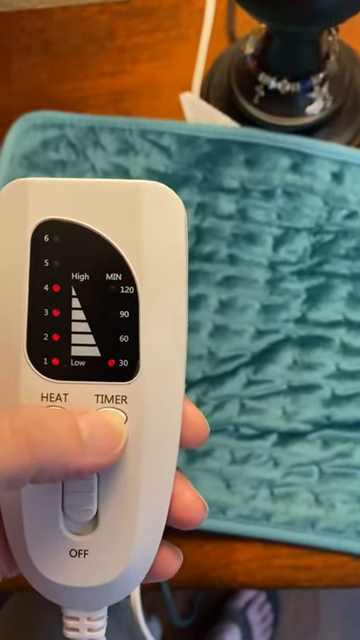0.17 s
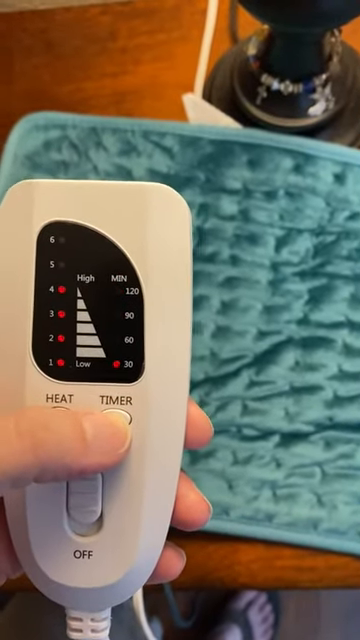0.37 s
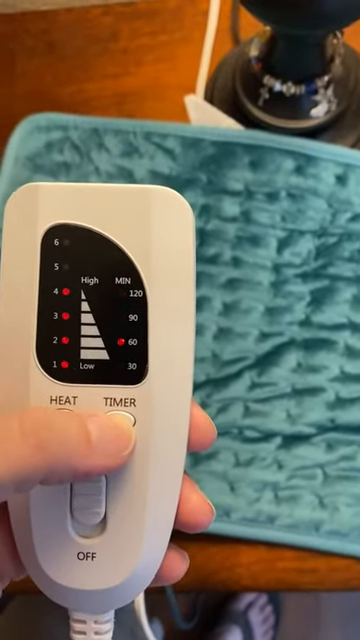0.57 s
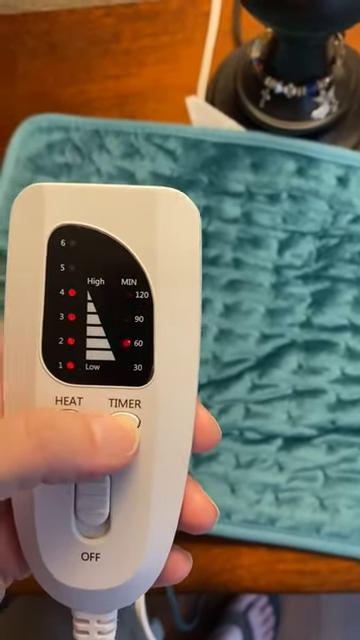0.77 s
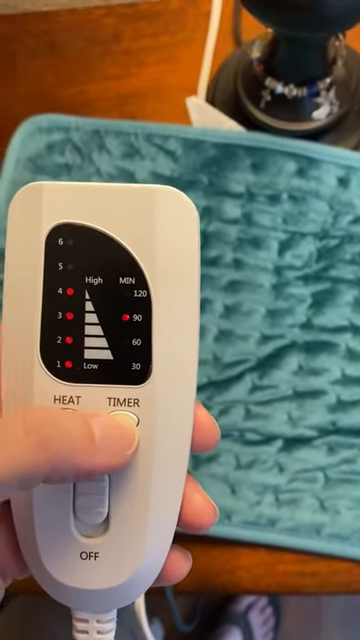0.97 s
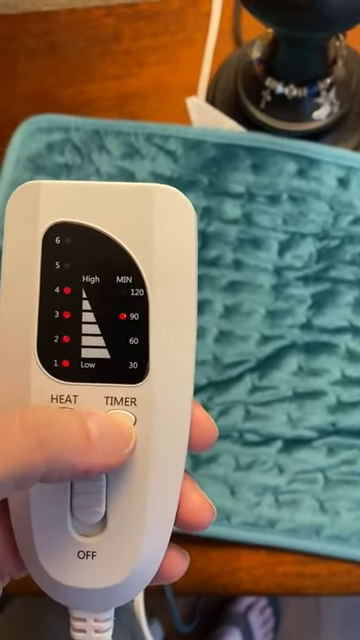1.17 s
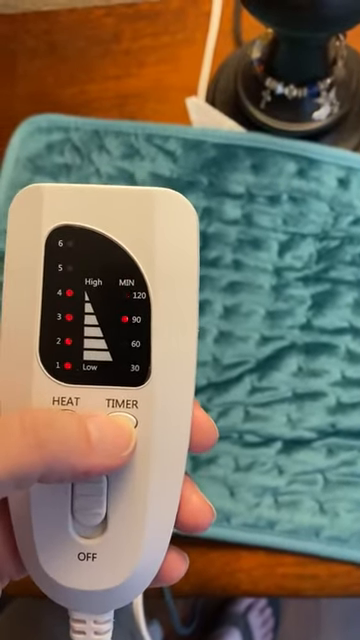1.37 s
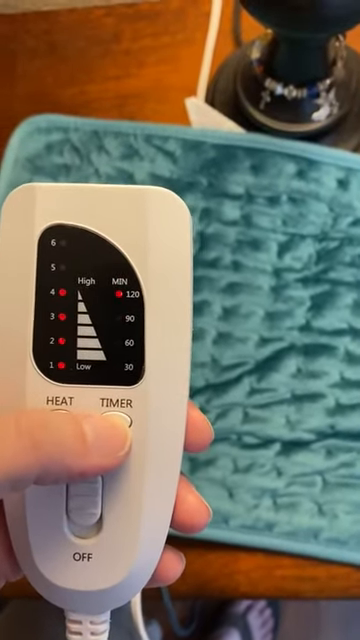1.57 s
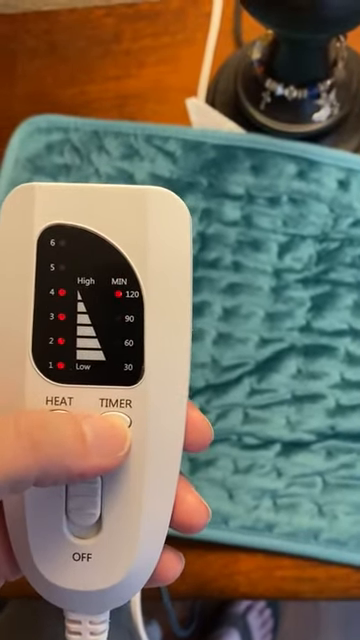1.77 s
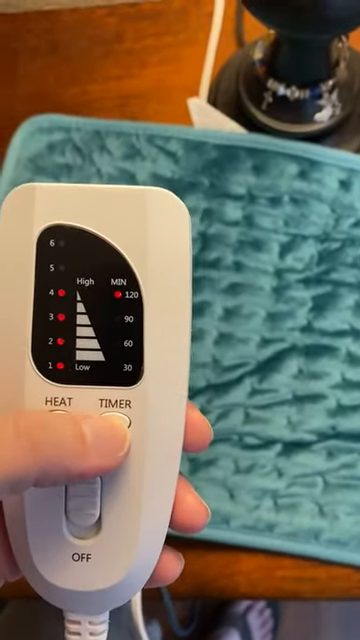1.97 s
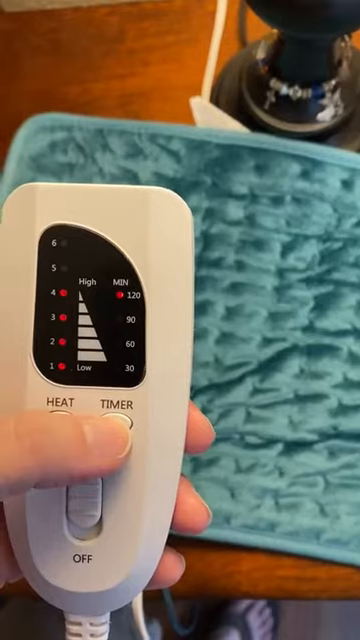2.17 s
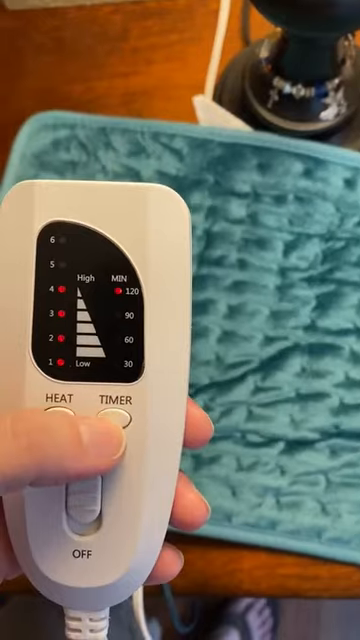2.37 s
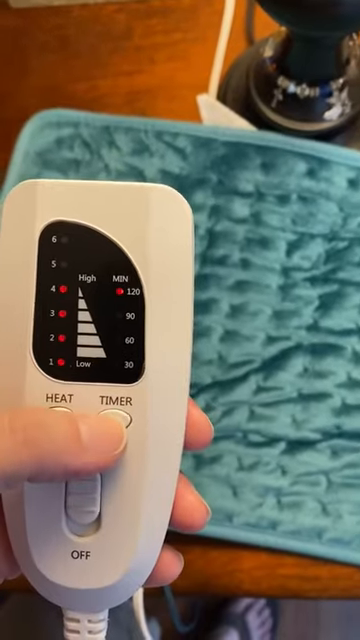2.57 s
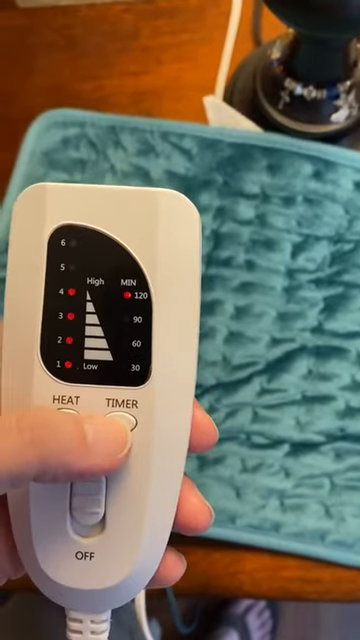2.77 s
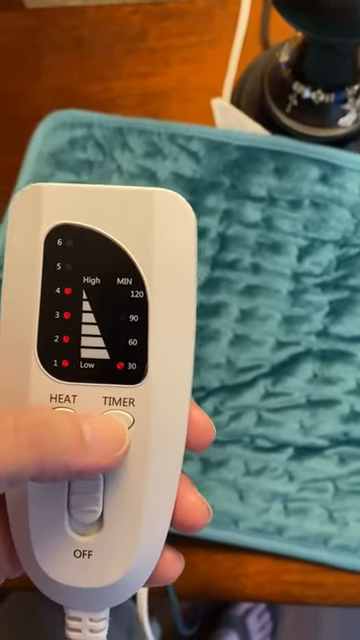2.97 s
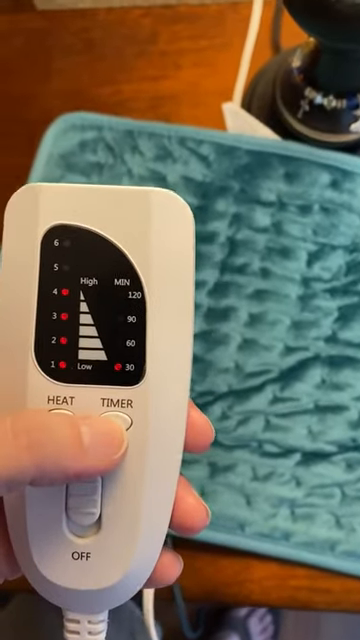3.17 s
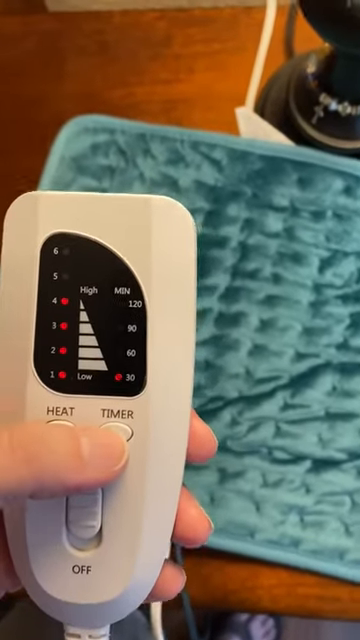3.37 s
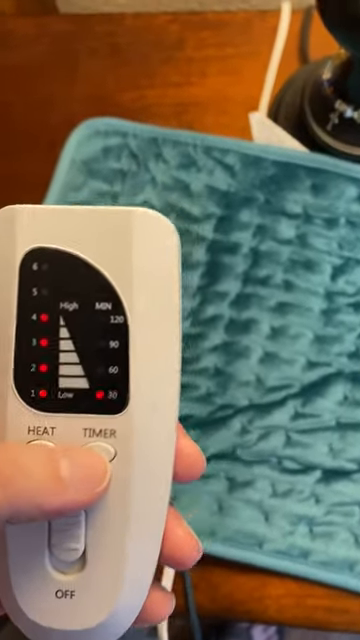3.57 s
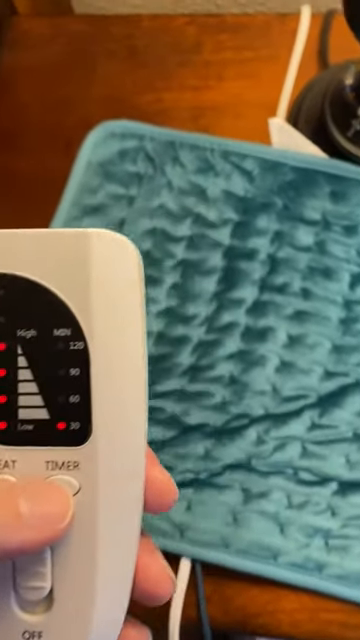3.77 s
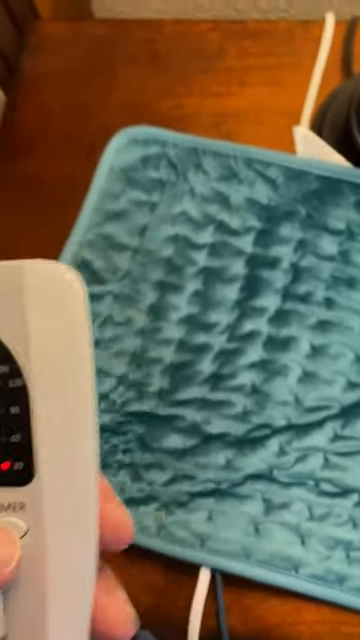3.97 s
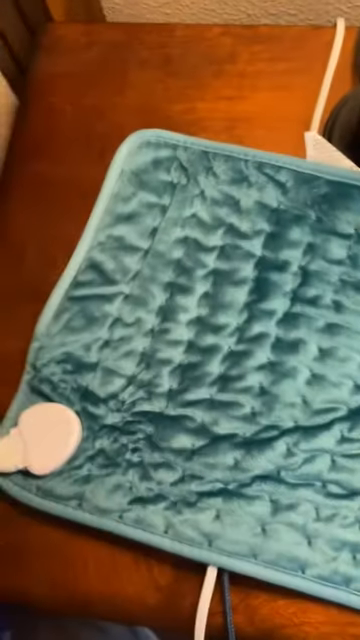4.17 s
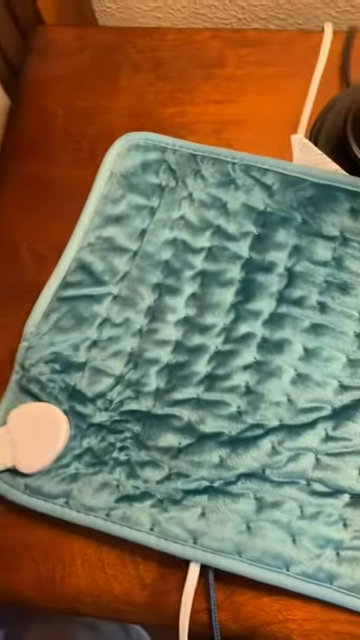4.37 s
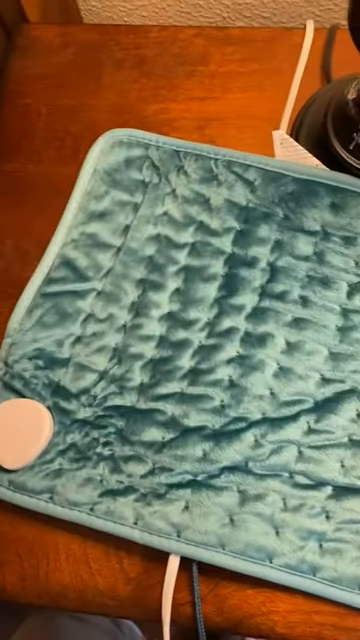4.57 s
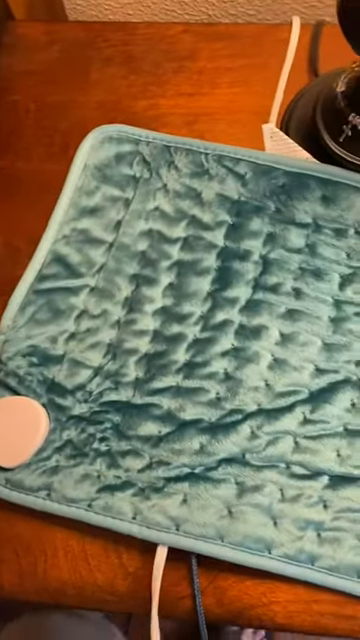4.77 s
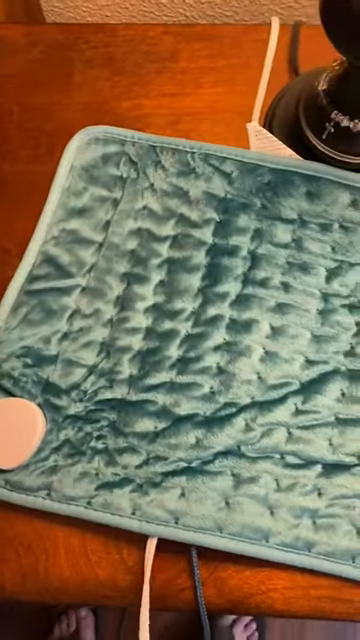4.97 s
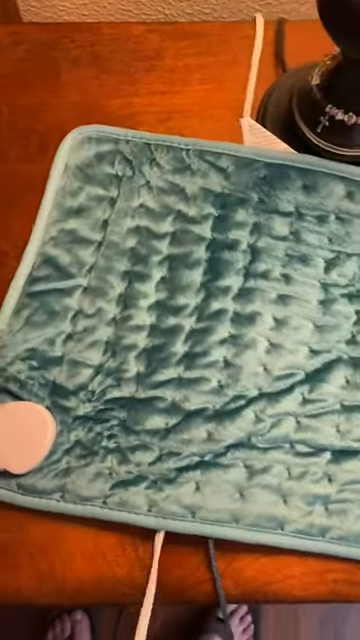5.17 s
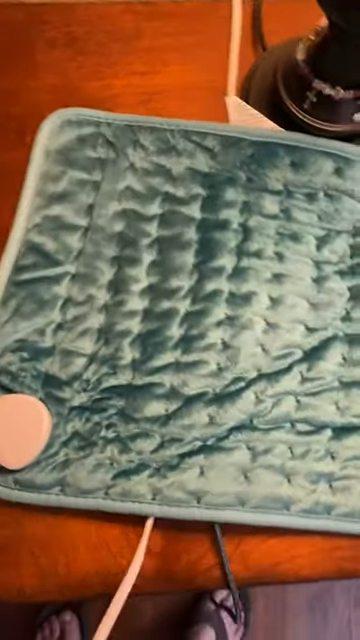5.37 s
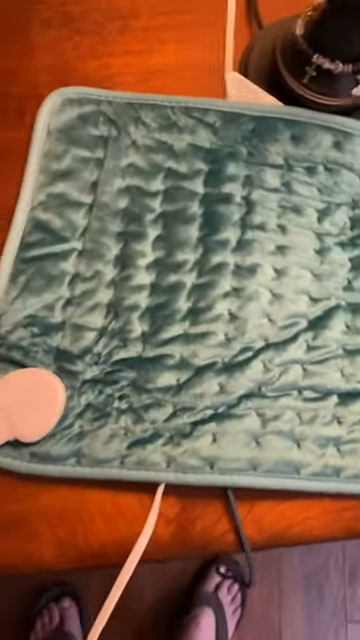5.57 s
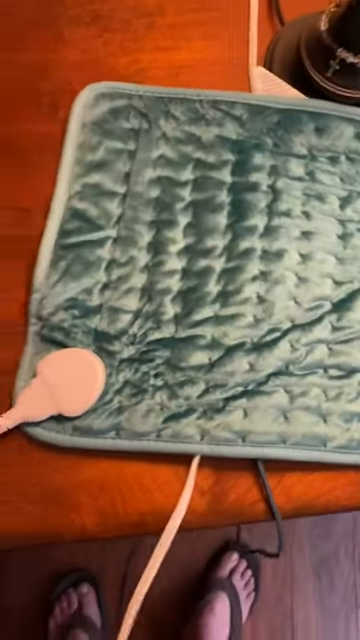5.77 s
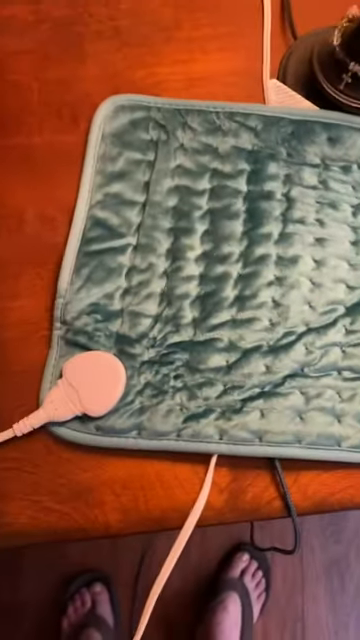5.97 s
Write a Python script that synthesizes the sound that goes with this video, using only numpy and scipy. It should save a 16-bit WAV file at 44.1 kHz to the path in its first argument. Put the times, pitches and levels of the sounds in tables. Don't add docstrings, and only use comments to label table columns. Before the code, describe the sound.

Crisp snapping button presses with softer releases on a hollow plastic case, followed by faint handling rustle, one deep soft thud and a small tick.

```python
import sys
import numpy as np
from scipy import signal
from scipy.fft import rfft, irfft
from scipy.io import wavfile
from scipy.ndimage import uniform_filter1d

SR = 44100
rng = np.random.default_rng(int(sys.argv[2]) if len(sys.argv) > 2 else 0)


def output_pcm(signal):
    pcm = np.clip(np.atleast_2d(signal).T, -1, 1) * 32767
    wavfile.write(sys.argv[1], SR, np.round(pcm).astype(np.int16))


def volts_from_db(level):
    exponent = np.asarray(level, float) / 20
    return 10 ** exponent


N = 265041


def ramp(seconds):
    return np.arange(int(seconds * SR)) / SR


def curve(rows):
    s, *columns = np.transpose(rows)
    return [np.interp(np.arange(N) / SR, s, c) for c in columns]


def colour(x, points):
    hz, db = np.transpose(points)
    f = np.maximum(np.fft.rfftfreq(x.shape[-1], 1 / SR), 1)
    gain_db = np.interp(np.log(f), np.log(hz), db)
    return irfft(rfft(x) * volts_from_db(gain_db), x.shape[-1])


def band(x, lo_hz, hi_hz, order=2):
    sos = signal.butter(order, [lo_hz, min(hi_hz, 0.45 * SR)], "band", fs=SR, output="sos")
    y = signal.sosfilt(sos, x)
    return y / np.sqrt(np.mean(y ** 2))


def high_pass(x, hz, order=1):
    return signal.sosfilt(signal.butter(order, hz, "high", fs=SR, output="sos"), x)


def noise(alike_hz, size=N):
    mid, side = rng.standard_normal((2, size))
    side = high_pass(side, alike_hz)
    return np.array([mid + side, mid - side]) / np.sqrt(2)


def walk(rate_hz):
    k = int(SR / rate_hz)
    held = np.repeat(rng.standard_normal(N // k + 1), k)
    return 1.2 * uniform_filter1d(held, k)[:N]


def tone(hz):
    return np.sqrt(2) * np.sin(2 * np.pi * np.cumsum(hz) / SR)


def jerks(size_db):
    return volts_from_db(size_db * rng.exponential(size=N) + 2.0 * walk(70))


def add(out, start_s, sound):
    i = int(start_s * SR)
    out[:, i:i + sound.shape[1]] += sound[:, :N - i]


def strokes(rows, lift_db):
    rise_share, fade_db = 0.19, -9.5
    power, t = 0, np.arange(N) / SR
    for (start_s, length_s, level_db, _), lift in zip(rows, lift_db):
        at = (t - start_s) / length_s
        swell = np.clip(at / rise_share, 0, 1)
        fade = volts_from_db(fade_db * np.clip(at - rise_share, 0, 2) ** 2) * np.clip(4 - 3 * at, 0, 1)
        power = power + (volts_from_db(level_db + lift) * swell * fade) ** 2
    return np.sqrt(power)


def bursts(rows, width, lift_db, t60_s):
    out, t = np.zeros((2, N)), ramp(0.091)
    rise = np.clip(t / 0.0013, 0, 1)
    for start_s, level_db, pitch_hz, pan_db in rows:
        slip = band(noise(870, size=len(t)), pitch_hz / width, pitch_hz * width, order=1)
        slip = slip * volts_from_db(-60 * t / t60_s)
        port_db = np.array([[pan_db], [-pan_db]]) / 2
        add(out, start_s, slip * rise * volts_from_db(level_db + lift_db + port_db))
    return out


def ring(modes, lag_ms, rise_ms):
    hz, level_db, t60_s, pan_db = np.transpose(modes)[:, :, None]
    detune, uneven_db = rng.standard_normal((2, len(modes), 1)) * [[[0.006]], [[1.2]]]
    both = []
    for side in (0.5, -0.5):
        t = np.maximum(ramp(0.08) - 0.0005 - side * lag_ms / 1000, 0)
        wave = np.sin(2 * np.pi * hz * (1 + detune) * t) * volts_from_db(-60 * t / t60_s)
        wave = wave * (1 - np.exp(-t * 1000 / rise_ms))
        both.append(np.sum(volts_from_db(level_db + side * pan_db + uneven_db) * wave, axis=0))
    return np.array(both) / np.max(np.abs(both))


# pitch_hz [Hz], width_hz [Hz], level_db [dB]
TREBLE_DIPS = [(9000, 520, -26.5), (13600, 900, -16.5)]


def dip_treble(x):
    f = np.fft.rfftfreq(x.shape[1], 1 / SR)
    dips_db = sum(db * np.exp(-((f - hz) / width_hz) ** 2) for hz, width_hz, db in TREBLE_DIPS)
    return irfft(rfft(x) * volts_from_db(dips_db), x.shape[1])


# start_s [s], dome_db [dB], case_db [dB], rattle_ms [ms], room_db [dB]
PRESSES = [
    (0.074, -20.5, -40, 0.2, 0.5),
    (0.4616, -22, -36, 0.86, 1),
    (0.8354, -20.5, -34.5, 0.43, 2),
    (1.4183, -22.5, -36, 0.31, -0.5),
    (2.8312, -17, -36.5, 0.83, 0),
]
# start_s [s], dome_db [dB], case_db [dB], rattle_ms [ms], room_db [dB]
RELEASES = [
    (0.2268, -33.5, -33, 1.84, 3.5),
    (0.618, -34.5, -33, 8.7, -1),
    (1.0024, -34.5, -32, 2.5, -1),
    (1.5945, -32.5, -32.5, 1.8, -1),
    (3.0105, -33.5, -32, 1.7, -1.5),
]


def button():
    table_ms, table_db = 5.2, -8
    press_push_ms, release_push_ms = 0.4, 0.17
    out = np.zeros((2, N))
    clicks = [(*row, press_push_ms) for row in PRESSES] + [(*row, release_push_ms) for row in RELEASES]
    for start_s, dome_db, case_db, rattle_ms, room_db, push_ms in clicks:
        dome = volts_from_db(dome_db + 8) * dome_snap(rattle_ms)
        case = volts_from_db(case_db + 9) * case_ring(push_ms)
        add(out, start_s + 0.0001, case - dome)
        add(out, start_s + table_ms / 1000, volts_from_db(table_db) * (case + 0.25 * dome))
        add(out, start_s + 0.0012, room(room_db, case_db - dome_db))
    return out


# [dB, left minus right]
DOME_MODES = [(1750, -16.5, .007, 2.5), (3244, -11, 0.017, -3), (4560, -10, 0.022, 4),
              (4790, -7.5, .008, 7.5), (5470, -10, 0.014, 11), (6820, -4, 0.0071, -0.5),
              (7500, -0.5, 0.0028, 1.5), (8590, -5, .004, 12.5), (10695, 0, 0.0027, 0),
              (11630, -7, .003, -1.5), (14300, -4, .003, -1.5), (15200, -6, .003, -0.5)]


def dome_snap(rattle_ms):
    t = ramp(0.0049)
    rattle = rng.standard_normal(len(t)) ** 3 * np.exp(-t * 1000 / rattle_ms) * 0.03 * rattle_ms ** 2
    rattle[0] = 1
    rattle = signal.lfilter([1], [1, -np.clip(0.3 * rattle_ms, 0, 0.8)], rattle)
    dome = signal.fftconvolve(ring(DOME_MODES, lag_ms=0.265, rise_ms=0.023), rattle[None])
    dome = 0.19 * dome + dip_treble(dome)
    return dome / np.max(np.abs(dome))


# [dB, left minus right]
CASE_MODES = [(367, -3.5, 0.019, -1.5), (434, -8.5, 0.022, -5.5), (600, 0.5, .02, -4), (697, -1, 0.017, -3),
              (811, 1, .018, 1), (957, -8.5, 0.0095, 6), (1200, -21, 0.015, 4), (1600, -11.5, .02, 11),
              (1772, -0.5, .012, 9), (2470, -4, 0.015, 2), (3150, -8, .011, -3.5)]


def case_ring(push_ms):
    t = ramp(0.0049)
    push = np.sin(np.pi * np.clip(t * 1000 / push_ms, 0, 1))
    case = signal.fftconvolve(ring(CASE_MODES, lag_ms=-0.12, rise_ms=0.66), push[None] / push.sum())
    return high_pass(case, 220)


# pitch_hz [Hz], level_db [dB]
ROOM_COLOUR = [(200, -10), (500, 5), (900, 6), (1700, 0.5), (3000, -3), (4500, -2.5), (7000, -11.5),
               (12000, -19), (16500, -18)]


def room(level_db, dark_db):
    near_db, near_t60_s, wall_t60_s = 14, 0.028, 0.36
    t = ramp(0.45)
    wash = band(colour(noise(900, size=len(t)), ROOM_COLOUR), 150, 17000)
    wash = colour(dip_treble(wash), [(900, 0.1 * dark_db), (9000, -0.3 * dark_db)])
    decay = volts_from_db(near_db - 60 * t / near_t60_s) + volts_from_db(-60 * t / wall_t60_s)
    return volts_from_db(-58 + level_db) * wash * decay


# [dB, upper modes]
THUMB_SHIFTS = [(0.638, 0.075, -71, -26), (0.773, .07, -65, -10), (.88, 0.19, -71.5, -0.5),
                (1.05, 0.081, -71, -20), (1.89, 0.12, -87, -14), (2.278, 0.053, -92, 10),
                (2.35, 0.1, -72, -16), (2.487, 0.026, -69, -27), (2.561, 0.092, -70, -13),
                (2.728, 0.25, -77.5, -6), (3.049, .1, -69, -25)]


def thumb():
    upper_db = np.transpose(THUMB_SHIFTS)[3]
    slips = jerks(size_db=3.0) * noise(710)
    upper = band(slips, 1500, 2500)
    lower = band(slips, 640, 1050)
    return strokes(THUMB_SHIFTS, 0 * upper_db) * lower + strokes(THUMB_SHIFTS, upper_db) * upper


# [dB, left minus right]
CREAK_SLIPS = [(0.757, -53, 600, -3), (0.791, -49.5, 537, -5), (1.124, -66, 731.6, 7),
               (1.507, -62.5, 866, -17), (2.361, -72, 840, 4), (2.389, -70, 870, 8), (2.42, -65, 852, 3),
               (2.493, -59.5, 770, 8), (2.558, -64.5, 674, 4), (2.595, -59, 800, 5), (2.625, -59, 659, 0),
               (2.692, -63.5, 743, 1), (3.12, -57, 478, -5), (3.145, -58, 474, 8.5), (4.031, -64, 853, 2),
               (5.008, -44.5, 416, -2), (5.035, -56, 1030, 21), (5.064, -41, 427, 3), (5.18, -67, 870, -17),
               (5.066, -47, 800, -5), (5.768, -53, 1270, -2), (5.776, -47, 350, 0),
               (5.778, -46.5, 919, -15), (5.826, -44.5, 403, -2), (5.896, -53, 513.5, 6.5)]


def creaks():
    return bursts(CREAK_SLIPS, width=1.05, lift_db=0.66, t60_s=0.05)


# [dB, left minus right]
TICK_SLIPS = [(0.174, -62, 2960, 7), (0.3894, -80, 3260, 2), (0.588, -59, 3060, 3), (0.7567, -66, 6400, -6),
              (0.968, -56, 2300, -8), (2.595, -76, 1925, 1.5), (0.76, -84, 2280, 0), (0.778, -61, 5990, 0),
              (0.7941, -76, 2240, 4.5), (0.8011, -71, 4320, -22.5), (1.5589, -76, 1809, 26),
              (2.2865, -60.5, 1810, -0.5), (3.6198, -68, 11840, -13), (3.6323, -56.5, 11300, 0.5),
              (3.8285, -69.5, 6670, 0.5), (3.8894, -78, 3965, -1.5), (3.993, -78, 1766, 9),
              (4.1984, -66, 7110, -3), (4.2197, -68, 6830, 1), (5.6215, -54, 5880, 6.5),
              (5.6528, -68.5, 2210, -5), (5.665, -56, 6570, -2), (5.7695, -32.5, 5600, 1),
              (5.8243, -50.5, 3930, -4), (5.897, -62, 1972, -10)]


def ticks():
    return bursts(TICK_SLIPS, width=1.1, lift_db=-1.6, t60_s=0.024)


# start_s [s], level_db [dB], pitch_hz [Hz], t60_s [s]
KNOCK_MODES = [
    (5.065, -33.5, 350, 0.027),
    (5.081, -36.5, 310, 0.078),
    (5.091, -33.5, 140.7, 0.17),
    (5.099, -27, 77.6, 0.084),
]


def knock():
    out = np.zeros((2, N))
    t = ramp(0.25)
    for start_s, level_db, pitch_hz, t60_s in KNOCK_MODES:
        swell = 1 - np.exp(-t * pitch_hz * 2.5)
        blow = np.sin(2 * np.pi * pitch_hz * t) * swell * volts_from_db(level_db - 60 * t / t60_s)
        add(out, start_s, np.array([blow, blow]))
    return out


# start_s [s], length_s [s], level_db [dB], bright_db [dB]
RUSTLE_STROKES = [(3.61, 0.13, -95.5, 12.5), (3.713, 0.34, -88.5, 7.5), (4.175, 0.55, -76.5, 1.5),
                  (4.549, 0.32, -64, 3.5), (4.756, 0.24, -73.5, -9.5), (4.907, 0.18, -69, 3),
                  (5.015, 0.044, -58.5, 6), (5.055, 0.13, -66, -1.5), (5.163, 0.12, -71.5, 3),
                  (5.238, 0.62, -78.5, 4.5), (5.759, 0.027, -56, 2), (5.782, 0.78, -69.5, -4.5)]


def rustle():
    bright_db = np.transpose(RUSTLE_STROKES)[3]
    slips = jerks(size_db=1.8)

    def fibres(lo_hz, hi_hz):
        return volts_from_db(1.54 * walk(30)) * band(slips * noise(270), lo_hz, hi_hz)

    rub = fibres(394, 610) * volts_from_db(-5) + fibres(655, 1146)
    hiss = fibres(1170, 1585) * volts_from_db(-9) + fibres(1520, 2960) * volts_from_db(-2) + fibres(3240, 6250) * volts_from_db(-3.5)
    sizzle = strokes(RUSTLE_STROKES, -8.5 + 2 * bright_db) * fibres(5900, 15300)
    return strokes(RUSTLE_STROKES, -bright_db) * rub + strokes(RUSTLE_STROKES, 0 * bright_db) * hiss + sizzle


# start_s [s], level_db [dB], pitch_hz [Hz]
DRONE_TRACK = [(0.0, -45, 57.2), (0.17, -42.5, 56.8), (0.3, -42.5, 54.5), (0.58, -50.5, 52.27),
               (0.7, -50.5, 58.8), (0.87, -54.5, 60.4), (1.97, -54, 59.88), (2.09, -68, 60.7),
               (2.18, -53, 59.9), (4.33, -58.5, 59.9), (4.42, -53, 60), (5.06, -57, 59.4),
               (5.09, -45, 59.25), (5.44, -61, 59.9), (5.72, -56, 60.93), (5.84, -62, 66.4),
               (5.93, -52, 60.8), (6.01, -52, 58.2)]


def drone():
    pan_db, lag_ms = 0.26, 0.033
    low_db, pitch_hz = curve(DRONE_TRACK)
    s = np.arange(N) / SR
    low = tone(pitch_hz * (1 + 0.029 * walk(25))) + 0.22 * band(noise(460), 50, 65)
    follow_db = 0.3 * (low_db - low_db.mean())
    sink_db = -0.43 * (s - 3)
    upper_db = -64 + follow_db + sink_db + 2.0 * walk(11)
    out = volts_from_db(low_db + 1.25 * walk(10)) * low + volts_from_db(upper_db) * band(noise(400), 50, 150)
    return np.array([out[0] * volts_from_db(pan_db), np.interp(s - lag_ms / 1000, s, out[1])])


# start_s [s], end_s [s], from_hz [Hz], to_hz [Hz], level_db [dB]
MOTOR_SPELLS = [
    (1.831, 2.749, 308, 326, -71.5),
    (3.103, 3.687, 339.3, 341, -75.5),
]


def whine():
    out, s = np.zeros((2, N)), np.arange(N) / SR
    for start_s, end_s, from_hz, to_hz, level_db in MOTOR_SPELLS:
        on = np.clip(np.minimum(s - start_s, end_s - s) / 0.074, 0, 1)
        glide_hz = np.interp(s, [start_s, end_s], [from_hz, to_hz])
        out += on * volts_from_db(level_db + 1.2 * walk(5.84)) * tone(glide_hz)
    return out


# pitch_hz [Hz], level_db [dB per Hz]
AIR_COLOUR = [(24, -31.5), (40, -4), (79, -0.5), (118, -10.5), (164, -19.5), (206, -25.5), (316, -19.5),
              (396, -26.5), (690, -41), (933, -44.5), (6830, -57.5), (9010, -57.5), (16500, -79.5)]


def air():
    level_db = -73.5
    lull_s, lull_width_s, lull_db = 4.39, 0.24, -15.5
    hush = colour(noise(510), AIR_COLOUR)
    above = high_pass(hush, 200, order=4)
    murmur = colour(hush, [(90, -60), (130, 0), (500, 0), (900, -60)])
    lull = volts_from_db(lull_db * np.exp(-((np.arange(N) / SR - lull_s) / lull_width_s) ** 2))
    sway = volts_from_db(level_db + 0.9 * walk(2.5))
    return (hush + (lull - 1) * murmur) * sway / np.sqrt(np.mean(above ** 2))


def scene():
    handling = thumb() + creaks() + ticks() + knock()
    return button() + handling + drone() + whine() + dip_treble(rustle() + air())


def top_cut(x):
    return signal.sosfilt(signal.butter(12, 17130, fs=SR, output="sos"), x)


def record(dry):
    cut = signal.ellip(6, 0.2, 50, 15950, fs=SR, output="sos")
    return top_cut(signal.sosfilt(cut, dry))


dry = scene()
out = record(dry)
output_pcm(out)
```